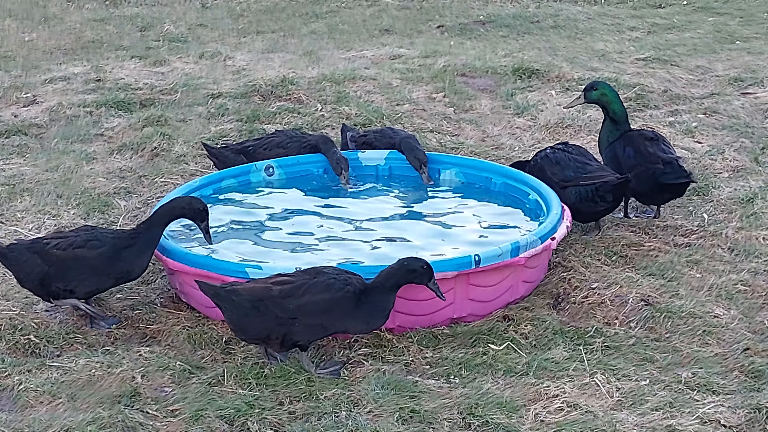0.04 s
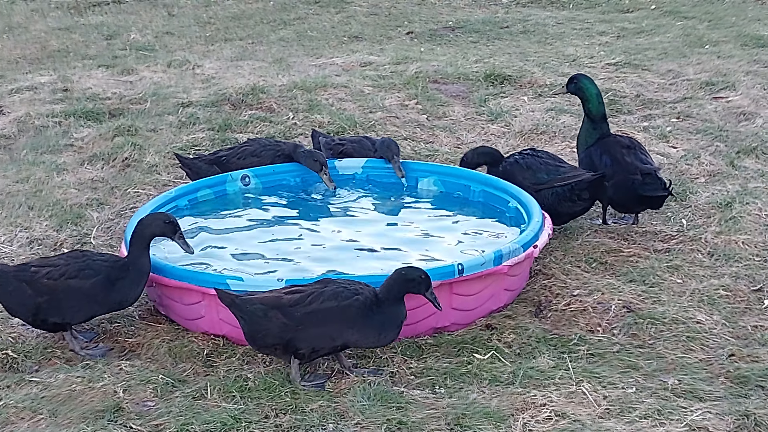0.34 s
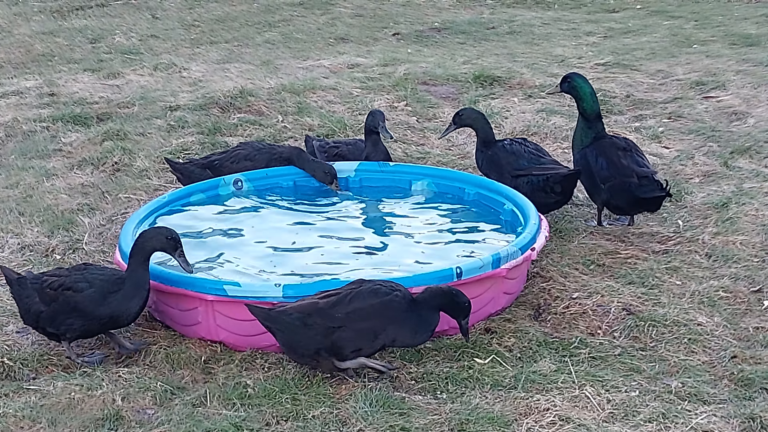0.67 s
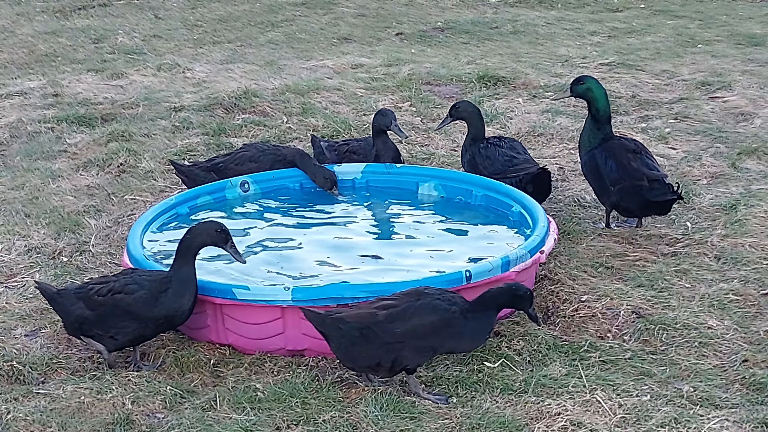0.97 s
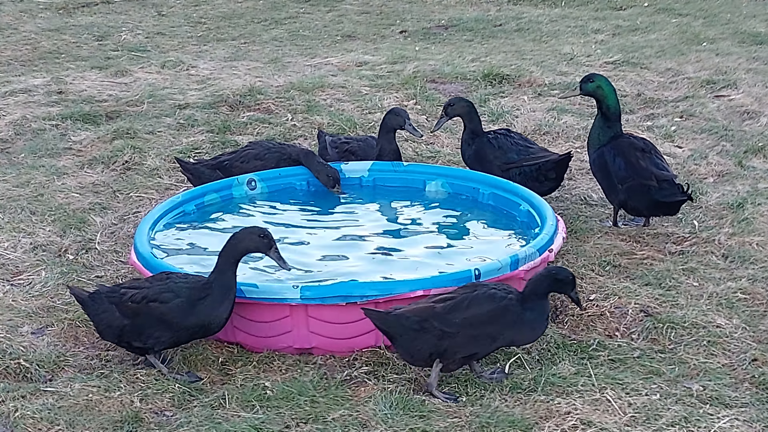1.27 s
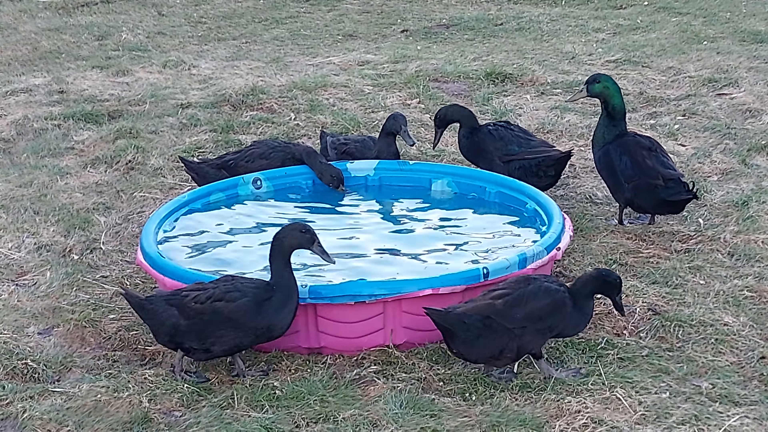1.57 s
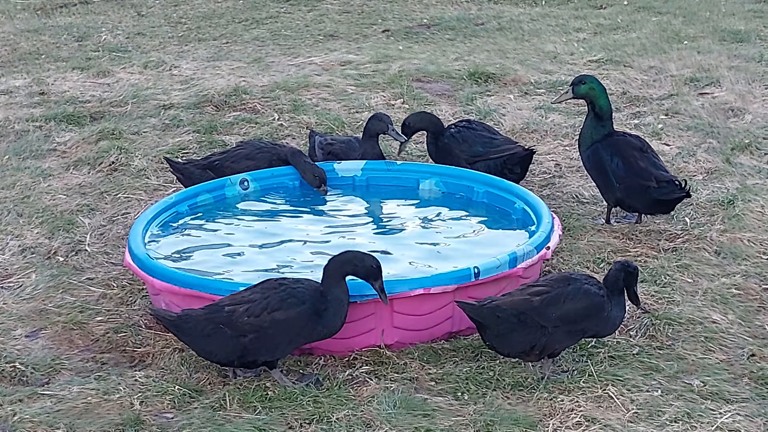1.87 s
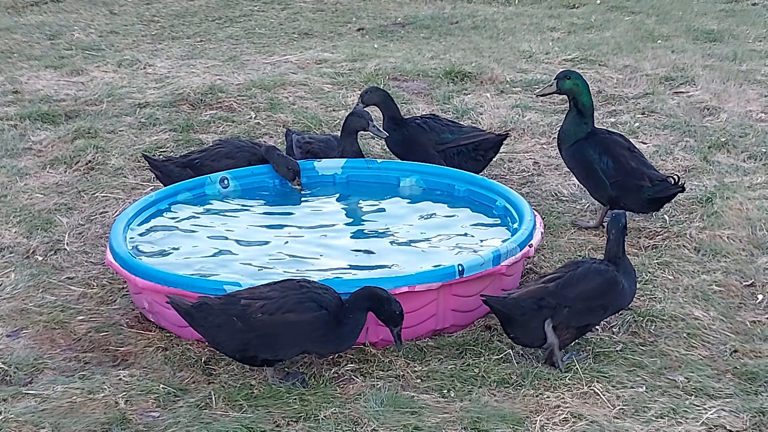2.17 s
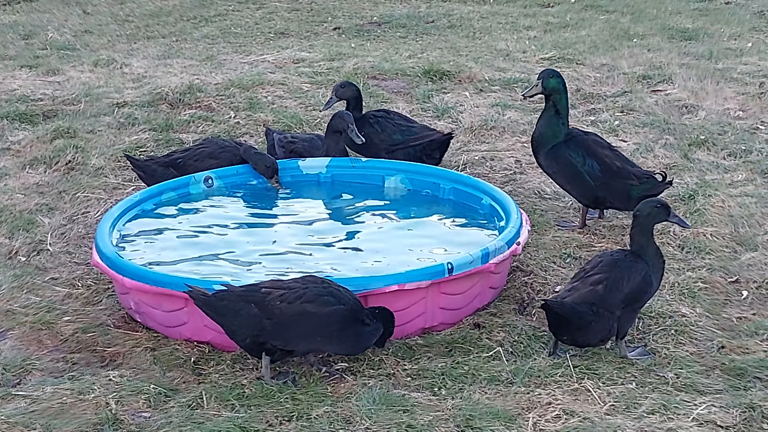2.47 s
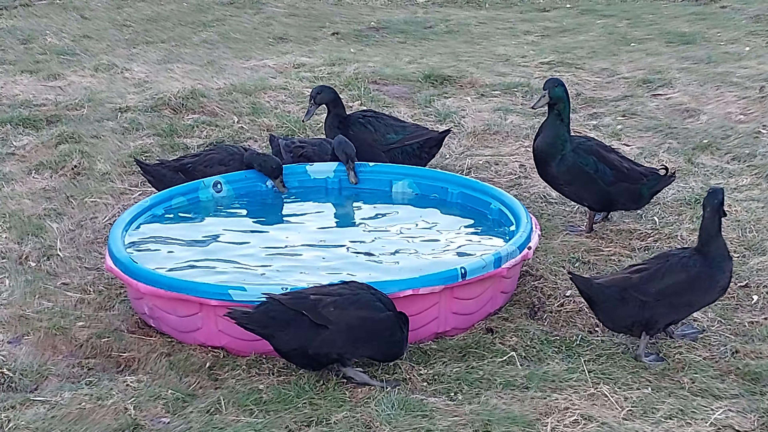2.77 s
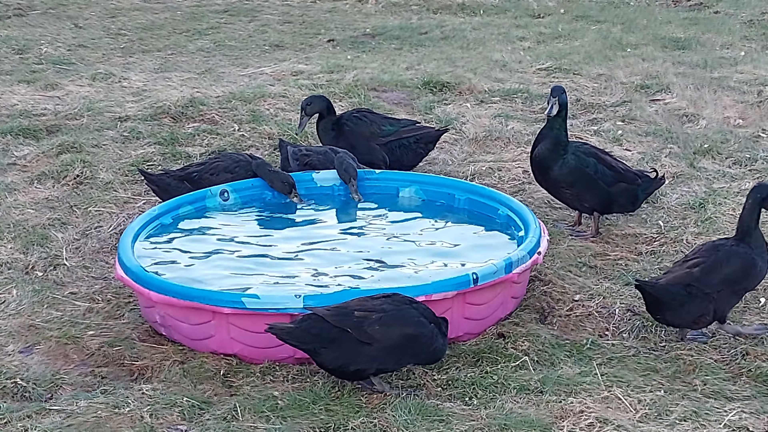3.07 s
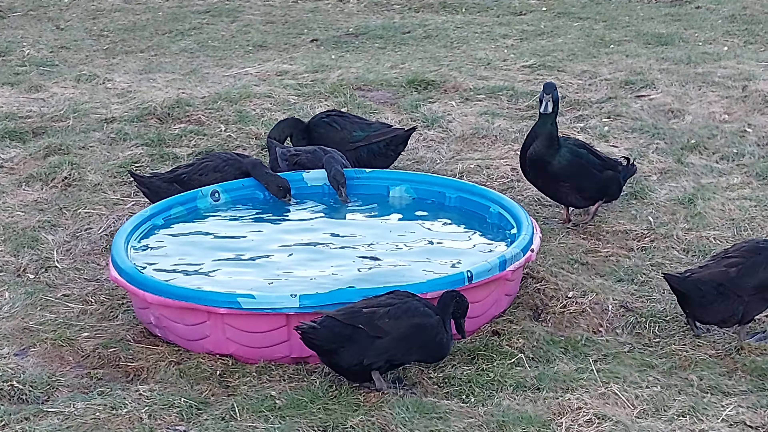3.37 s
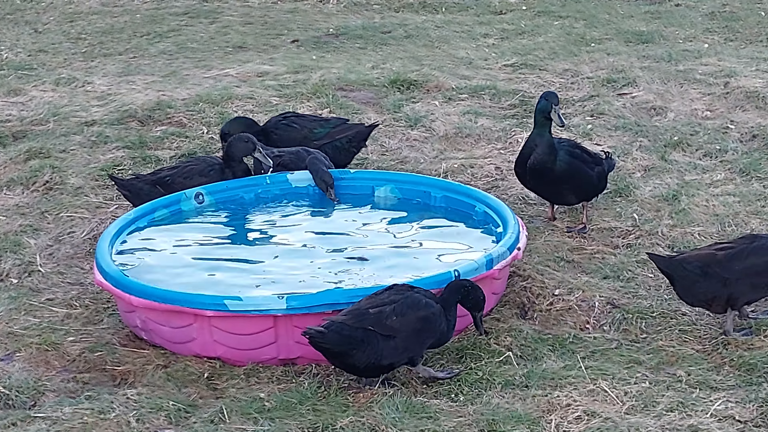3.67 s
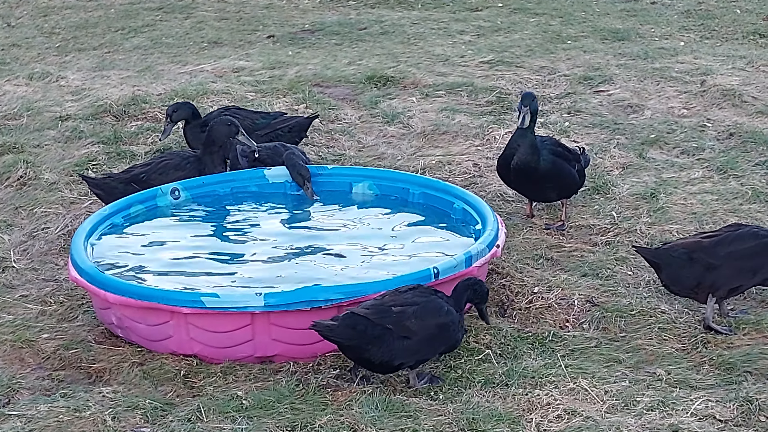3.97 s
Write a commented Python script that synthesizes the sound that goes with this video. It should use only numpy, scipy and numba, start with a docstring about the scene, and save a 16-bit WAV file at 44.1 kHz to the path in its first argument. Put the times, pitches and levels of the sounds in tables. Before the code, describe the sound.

Soft, short duck quacks and raspy calls mix with wet bill clicking outdoors, while far engines and a road hum quietly.

```python
"""A grassy yard with a plastic wading pool, ducks feeding a few metres from the microphone.
Their bills click, smack and dabble in wet grass and mud. Hens give low quacks, membrane pulses ringing
throat and chest; drakes give short hoarse rasps, slower breathy pulses in a long windpipe.
Far off, a small bird chirps twice and engines hum and drone under the tyre wash of a road."""
import sys
import numpy as np
from scipy import signal
from scipy.fft import rfft, irfft
from scipy.io import wavfile
from scipy.ndimage import uniform_filter1d
from numba import njit

SR = 44100
rng = np.random.default_rng(int(sys.argv[2]) if len(sys.argv) > 2 else 0)


def unload_audio(sound):
    """Save the sound as a 16-bit wav file, at the path given as the first command line argument."""
    columns = np.transpose(np.atleast_2d(sound))
    # keep every value between -1 and 1, then stretch to whole-number steps
    steps = np.round(np.clip(columns, -1, 1) * 32767)
    wavfile.write(sys.argv[1], SR, steps.astype(np.int16))


N = 319725
TIME = np.arange(N) / SR
TOP_HZ = 15900  # upper edge of the recorder's band


def amp(db):
    """Decibels to gain."""
    return 10 ** (np.asarray(db) / 20)


def unit(x):
    """Scale to rms 1."""
    return x / np.sqrt(np.mean(x ** 2) + 1e-20)


def curves(table):
    """The columns after a table's time column, one value a sample."""
    times, *columns = np.transpose(table)
    return [np.interp(TIME, times, column) for column in columns]


def swells(table, rest_db):
    """Bell-shaped swells over a steady level, as a gain."""
    power = sum(amp(db) ** 2 * np.exp(-((TIME - s) / half_s) ** 2) for s, half_s, db in table)
    return np.sqrt(amp(rest_db) ** 2 + power)


def wander(rate_hz):
    """Smooth random drift with a spread near 1."""
    hold = int(SR / rate_hz)
    steps = np.repeat(rng.standard_normal(N // hold + 1), hold)
    return 1.3 * uniform_filter1d(uniform_filter1d(steps, hold), hold)[:N]


@njit
def state_variable_filter(x, hz, width):
    """Band-pass with a moving centre, gain 1 there."""
    y, band_state, low_state = np.empty(len(x)), 0., 0.
    for i in range(len(x)):
        gain, damping = np.tan(np.pi * hz[i] / SR), width / hz[i]
        band = (band_state + gain * (x[i] - low_state)) / (1 + gain * (gain + damping))
        band_state = 2 * band - band_state
        low_state += 2 * gain * band
        y[i] = damping * band
    return y


def bandpass(x, hz, width):
    """One band, steady or moving."""
    return state_variable_filter(x, np.minimum(hz, TOP_HZ) * np.ones(len(x)), float(width))


def resonate(x, hz, width):
    """A steep-sided resonance: two wider bands in series."""
    return bandpass(bandpass(x, hz, 1.31 * width), hz, 2 * width)


def resonances(x, table, scale=1):
    """A table's resonances side by side, their frequencies times scale."""
    return sum(amp(db) * resonate(x, hz * scale, width) for hz, width, db in table)


def pan(db):
    """Left and right gains, the left louder by db."""
    return amp(np.array([[db], [-db]]) / 2)


def add(out, s, x, pan_db=0):
    """Mix a short sound in at s seconds."""
    start = max(int(s * SR), 0)
    out[:, start:start + len(x)] += pan(pan_db) * x[:N - start]


def wash(spectrum, likeness, lag_ms=0):
    """Coloured stereo noise; likeness is the power share common to both sides, late on the right."""
    freqs = np.maximum(np.arange(N // 2 + 1) * SR / N, 1)
    hz, db = np.transpose(spectrum)
    colour = amp(np.interp(np.log(freqs), np.log(hz), db, left=-90, right=-90))
    common, left, right = rfft(rng.standard_normal((3, N)))
    shared = np.array([common, common * np.exp(-2j * np.pi * freqs * lag_ms / 1000)])
    sides = np.sqrt(likeness) * shared + np.sqrt(1 - likeness) * np.array([left, right])
    return unit(irfft(colour * sides, N))


# Still air around the microphone. Each row: frequency in Hz, relative density in dB.
AIR_SPECTRUM = [(1650, -35), (2800, -8), (3260, -11), (3860, -5.5), (5280, -5), (5890, -4.5), (6670, 4),
                (7600, -2.5), (12400, -9), (14200, -9), (16000, -10)]


def still_air():
    """A faint, wide, high hiss."""
    return amp(-79.5) * wash(AIR_SPECTRUM, likeness=0.013)


# Tyres on the distant road, roar and hiss. Each row: frequency in Hz, relative density in dB.
ROAR_SPECTRUM = [(200, -22), (400, -12.5), (600, -1.5), (900, 6), (1200, -2), (1600, -13), (2400, -57)]
HISS_SPECTRUM = [(900, 2), (1600, -1.5), (1900, -4), (2350, -9), (2700, -16.5), (3500, -27), (5000, -54)]


def vehicle(passing, exhaust_spectrum, tyre_likeness, lag_ms):
    """Exhaust and tyres waver in moving air and fall off either side of the nearest point."""
    nearest_s, half_power_s, rumble_db, roar_db, hiss_db = passing
    layers = [(rumble_db, wash(exhaust_spectrum, .93, lag_ms)),
              (roar_db, wash(ROAR_SPECTRUM, tyre_likeness, lag_ms)),
              (hiss_db, wash(HISS_SPECTRUM, tyre_likeness, lag_ms))]
    wavering = sum(noise * amp(db + 1.5 * wander(16)) for db, noise in layers)
    relative_distance = np.hypot(1, (TIME - nearest_s) / half_power_s)
    return wavering / relative_distance


# Exhausts far ahead of the microphone and off left. Each row: frequency in Hz, relative density in dB.
EXHAUST_AHEAD = [(20, -37), (40, -17), (55, -1.5), (80, 3), (125, -1.5), (170, -5), (240, -2.5), (300, -13),
                 (420, -19), (700, -20.5)]
EXHAUST_LEFT = [(20, -24), (40, -12.5), (55, -3.5), (90, 3), (130, -0.5), (180, -1.5), (240, -8),
                (300, -18), (420, -34.5), (700, -64)]
# Vehicles passing there. Each row: nearest moment in seconds, seconds from then until 3 dB down,
# then exhaust rumble, tyre roar and tyre hiss in dB.
TRAFFIC_AHEAD = [(.55, 0.65, -52, -55.5, -69.5), (1.7, 0.11, -55, -56.5, -100),
                 (2.85, 0.22, -52, -58.5, -69.5)]
TRAFFIC_LEFT = [(4.9, 0.75, -49, -56.5, -65), (6.0, 0.28, -55.5, -58, -65.5)]


def road():
    """Vehicles pass ahead, then on the left, over steady traffic farther off."""
    far_roar = amp(-63) * wash(ROAR_SPECTRUM, likeness=0.062)
    far_hiss = amp(-74.5) * wash(HISS_SPECTRUM, likeness=0.049)
    ahead = sum(vehicle(row, EXHAUST_AHEAD, tyre_likeness=0.18, lag_ms=0.051) for row in TRAFFIC_AHEAD)
    left = sum(vehicle(row, EXHAUST_LEFT, tyre_likeness=0.84, lag_ms=0.5) for row in TRAFFIC_LEFT)
    return far_roar + far_hiss + ahead + left


def far_tone(hz, db, waver, flutter_db, harmonics_db=(0,)):
    """A wavering tone whose harmonics fade in and out with the air."""
    phase = 2 * np.pi * np.cumsum(hz * (1 + waver * wander(14))) / SR
    return np.sqrt(2) * sum(amp(db + harmonic_db + flutter_db * wander(11)) * np.sin(k * phase)
                            for k, harmonic_db in enumerate(harmonics_db, 1))


# An engine idling far from the yard. Each row: time in seconds, firing rate in Hz, level in dB.
IDLE_CURVE = [(0, 65.9, -54.5), (1.4, 63.93, -53), (4.8, 62.6, -52), (6.3, 61.03, -51), (6.7, 60.3, -63),
              (7.25, 62.3, -54)]


def idling_engine():
    """A low hum of the firing rate and two overtones, sagging and dipping near the end."""
    return far_tone(*curves(IDLE_CURVE), waver=0.02536, flutter_db=2.0, harmonics_db=[-1, -16.5, -17])


# A distant vehicle's engine. Each row: time in seconds, firing rate in Hz.
DRONE_PITCH = [(0, 223), (.3, 213), (.6, 196), (1.3, 194), (2.5, 213.5), (4.2, 215)]
# Its swells at the microphone. Each row: middle and half length in seconds, level in dB.
DRONE_SWELLS = [(.28, 0.17, -55), (1.88, 0.18, -56.5), (2.78, 0.16, -48.5), (3.2, 0.097, -52),
                (4.15, 0.15, -57.5)]


def droning_engine():
    """A drone at the firing rate that comes through in swells."""
    drone = far_tone(*curves(DRONE_PITCH), db=0, waver=0.0052, flutter_db=2.5)
    return swells(DRONE_SWELLS, rest_db=-70) * drone


def whine():
    """A thin, far whine that never stops."""
    return far_tone(hz=2280, db=-87.5, waver=0.008, flutter_db=1.5)


# The flock rummaging in the grass, a few metres off.
# Each row: middle and half length in seconds, relative level in dB.
RUMMAGING = [(.2, .15, -80), (.65, .18, -79), (2.8, .27, -78.5), (3.3, .12, -78), (4.37, .2, -80),
             (5.25, 0.13, -85.5), (5.88, .1, -79), (6.13, .1, -82.5), (6.6, .06, -86)]
RUMMAGING_REST_DB = -87.5


def dabbling(cracks_per_s=2000, nibbles_per_s=45, spread_db=2.2):
    """Wet blades of grass snap in countless tiny cracks, mostly on the right, among softer nibbles."""
    rates = np.array([[cracks_per_s], [cracks_per_s], [nibbles_per_s]])
    hits = rng.random((3, N)) < rates / SR
    sizes = amp(spread_db * np.minimum(rng.exponential(size=(3, N)), 4))
    left, right, bites = hits * sizes * rng.choice([-1, 1], (3, N))
    cracks = [bandpass(bandpass(side, 11300, 4900), 14200, 8800) for side in (left, right)]
    crackle = amp(-4.0) * pan(-17) * unit(np.array(cracks))
    bursts = uniform_filter1d(bites, size=130) * rng.standard_normal(N)
    nibbles = amp(-7.5) * unit(resonate(bursts, 6300, 3000))
    return swells(RUMMAGING, RUMMAGING_REST_DB) * (crackle + nibbles)


def smack(hz, width, rise_per_s=22, muffle_hz=3230):
    """A wet film bursts in a parting bill: a rising cavity resonance, muffled by water; peak 1."""
    t = TIME[:SR // 40]
    burst = rng.standard_normal(len(t)) * (1 - np.exp(-t / 0.0012)) * np.exp(-t / 0.0017)
    cavity = resonate(burst, hz * (1 + rise_per_s * (t - .003)), width)
    muffled = signal.sosfilt(signal.butter(4, muffle_hz, fs=SR, output="sos"), cavity)
    return muffled / np.abs(muffled).max()


# Bouts in the wet mud by the pool. Each row: middle and half length in seconds, level in dB.
MUD_BOUTS = [(.06, .06, -84.5), (.28, 0.045, -70), (.72, 0.068, -80), (2.86, 0.15, -73), (4.3, .09, -76),
             (6.15, 0.032, -75)]


def squelching(splashes_per_s=60, splash_hz=2310, spread_oct=0.2):
    """Tiny splashes at chance moments, each with its own size and pitch."""
    out, count = np.zeros((2, N)), int(splashes_per_s * N / SR)
    for s, size, octaves in rng.uniform([0, -1, -spread_oct], [TIME[-1], 1, spread_oct], (count, 3)):
        add(out, s, amp(3.4 * size) * smack(splash_hz * 2 ** octaves, width=770))
    return swells(MUD_BOUTS, rest_db=-93) * unit(out)


# Wet bills, a few metres straight ahead.
# Each row: start in seconds, peak in dB, cavity resonance and its width in Hz.
WET_SMACKS = [(0.022, -51, 2460, 330), (.103, -55.5, 2080, 1080), (.28, -58, 2300, 1400),
              (.305, -59, 2500, 900), (.699, -46.5, 1820, 340), (.737, -52, 2380, 380),
              (1.0964, -56, 1830, 350), (1.254, -53.5, 1880, 326), (2.336, -45, 1410, 322),
              (2.857, -56, 2400, 600), (2.889, -43, 2170, 600), (2.9783, -48.5, 1520, 715),
              (3.281, -51.5, 2420, 600), (4.288, -49, 2000, 600), (4.343, -51.5, 1950, 597),
              (6.066, -55, 2100, 600)]


def bill_smacks():
    """Single smacks of wet bills parting."""
    out = np.zeros((2, N))
    for s, db, hz, width in WET_SMACKS:
        add(out, s, amp(db) * smack(hz, width))
    return out


def faint_clicks(count, db=-71.5, spread_db=0.5, hz=8600, spread_oct=0.36):
    """Chance rows like those of LOUD_CLICKS, likelier while the ducks rummage."""
    effort = np.cumsum(swells(RUMMAGING, RUMMAGING_REST_DB))
    times = np.interp(rng.random(count), effort / effort[-1], TIME)
    return [(s, db + spread_db * size, hz * 2 ** (spread_oct * pitch))
            for s, (size, pitch) in zip(times, rng.standard_normal((count, 2)))]


# Bills snapping a few metres off, the duller ones ahead, the brighter right of the microphone.
# Each row: start in seconds, peak in dB, ring in Hz.
LOUD_CLICKS = [(0.0623, -61, 7890), (0.114, -62, 12300), (0.1628, -47, 7560), (0.2074, -56, 11600),
               (0.237, -42.5, 7000), (.257, -54, 5000), (.281, -55.5, 5600), (0.4596, -61, 4600),
               (.625, -57.5, 12300), (.6694, -62, 7300), (0.7002, -57, 6750), (0.7377, -58, 6690),
               (1.0121, -60, 13370), (1.185, -59, 5200), (1.9938, -62, 6500), (2.265, -55.5, 5070),
               (2.3376, -55.5, 5470), (2.36, -63, 5870), (2.585, -60, 8050), (2.6125, -60, 13700),
               (2.7227, -60, 13200), (2.9482, -61, 11800), (2.971, -50, 10100), (2.982, -45, 6030),
               (3.035, -53, 6200), (3.2186, -64, 4880), (3.281, -53, 5100), (3.292, -51, 7000),
               (3.307, -46, 7340), (3.645, -53.5, 4870), (3.662, -58, 5340), (3.7973, -61, 6630),
               (4.1016, -60.5, 6310), (4.2847, -52, 7000), (4.6019, -62, 11400), (5.9189, -58, 13500),
               (6.0691, -68, 7410), (6.137, -61, 7140), (6.294, -50.5, 7540), (6.6143, -63, 11000)]


def bill_clicks(ahead_hz=5060, pan_db_per_oct=-6, crack_s=0.00079):
    """Hard bills snap shut with a short crack, brighter the harder they close."""
    out, t = np.zeros((2, N)), TIME[:SR // 20]
    decay = np.exp(-t / crack_s)
    for s, db, hz in LOUD_CLICKS + faint_clicks(count=22):
        crack = rng.standard_normal(len(t)) * (1 - decay) ** 2 * decay
        brightness = amp(0.69 * (db + 38.5))
        click = resonate(crack, hz, 0.29 * hz) + brightness * resonate(crack, 13500, 6000)
        add(out, s, amp(db) * click / np.abs(click).max(), pan_db_per_oct * np.log2(hz / ahead_hz))
    return out


# A small bird, far off. Each row: start and length in seconds, level in dB, top pitch in Hz.
BIRD_NOTES = [(0.513, 0.07, -80.5, 3740), (6.089, 0.091, -86, 3780)]


def bird(rise=0.053, drop=0.2):
    """Thin wavering notes that rise a little and drop away at the end."""
    out = np.zeros((2, N))
    for s, length, db, hz in BIRD_NOTES:
        progress = np.linspace(0, 1, int(length * SR))
        arch = np.sin(np.pi * progress)
        pitch = hz * (1 + rise * (arch - 1) - drop * progress ** 8 + 0.021 * wander(300)[:len(arch)])
        add(out, s, amp(db) * unit(np.sin(2 * np.pi * np.cumsum(pitch) / SR) * arch))
    return out


def syrinx(length, first_hz, last_hz, breath, puff_s, jitter=.06, scatter_db=1.8):
    """Membrane slaps, each trailing a puff of air; also gives the call's progress from 0 to 1."""
    n = int((length + .02) * SR)
    slaps, s = np.zeros(n), .001
    for delay, size in rng.standard_normal((32, 2)):
        if s < length:
            slaps[int(s * SR)] = amp(scatter_db * size)
            rate_hz = first_hz + (last_hz - first_hz) * (s / length) ** 3
            s += np.exp(jitter * delay) / rate_hz
    puff_envelope = signal.lfilter([1], [1, -np.exp(-1 / (puff_s * SR))], slaps)
    puffs = puff_envelope * rng.standard_normal(SR)[:n]
    return unit(slaps) + breath * unit(puffs), np.minimum(TIME[:n] / length, 1)


# Resonances all hens share: throat, chest, nasal ring and the thin edge of an open bill.
# Each row: frequency and width in Hz, relative level in dB.
HEN_THROAT = [(562, 294, 1.5), (875, 285, 5.5), (1106, 214, 0), (2070, 1240, -11)]
HEN_CHEST = [(184, 91, 6.3), (308, 39, 6)]
HEN_NASAL = [(3060, 350, -1), (6900, 560, -15)]
HEN_BILL = [(3720, 460, -12), (4530, 240, -2.5), (5000, 320, -4), (6640, 450, -11)]
# Hens a few metres ahead of the microphone. Each row: start and length in seconds, level in dB,
# first and last pulse rate in Hz, throat and chest tuning as a ratio, the bird's own resonance in Hz,
# its gain in dB, chest gain in dB, bill opening as a cut-off in Hz, nasal gain in dB.
HEN_QUACKS = [(0.811, 0.058, -48.5, 173.1, 109.4, 1.05, 1046, 5, -4, 1370, -28),
              (2.721, 0.039, -51.5, 119.8, 111, 1.33, 1090, -10, 0, 1340, -31),
              (2.91, 0.022, -50, 124.8, 111, 1.38, 1200, 13, 0, 1800, -18),
              (3.004, 0.051, -50, 124.9, 131, 1.03, 1200, 9, 0, 1500, -38),
              (3.064, 0.066, -45, 160.1, 100, 1.014, 995, 0, -0.5, 2600, -41),
              (3.3453, 0.061, -43.5, 180, 115.5, 1.08, 1280, 7, 1, 3030, -19),
              (5.774, 0.044, -53, 157.3, 125.3, 0.94, 717, 14.5, -1.5, 1220, -40),
              (7.081, 0.067, -47.5, 153.3, 62.8, 0.89, 590, 11, 2, 1500, -9.5),
              (7.206, 0.047, -70.5, 131.3, 101, 0.8, 1020, 6, -12, 1280, -39)]


def hens(throat_fall=0.2, throat_arch=0.047):
    """Pulses, mostly slowing, ring the chest and a sinking throat; a half-shut bill dulls the voice."""
    out = np.zeros((2, N))
    for quack in HEN_QUACKS:
        s, length, db, first_hz, last_hz, scale, own_hz, own_db, chest_db, open_hz, nasal_db = quack
        pulses, progress = syrinx(length, first_hz, last_hz, breath=0.22, puff_s=0.0015)
        effort = np.sin(np.pi * progress)
        pulses *= 0.45 + 0.61 * progress + effort
        bend = scale * (1 + throat_fall * (.5 - progress) + throat_arch * (effort - 2 / np.pi))
        throat = resonances(pulses, HEN_THROAT, bend)
        chest = amp(chest_db) * resonances(pulses, HEN_CHEST, scale)
        own_ring = amp(own_db) * resonate(pulses * effort, own_hz, 76)
        voice = signal.sosfilt(signal.butter(3, open_hz, fs=SR, output="sos"), throat + chest + own_ring)
        nasal = amp(nasal_db) * resonances(pulses * effort, HEN_NASAL)
        edge = amp(-24.0 + 8.5 * np.log2(open_hz / 2000)) * resonances(pulses, HEN_BILL)
        add(out, s, amp(db) * unit(voice + nasal + edge))
    return out


# Resonances of a drake's windpipe and of the hiss in his bill.
# Each row: frequency and width in Hz, relative level in dB.
DRAKE_WINDPIPE = [(1250, 82, 8.5), (1563, 93, 6.5), (1956, 80, 2), (2424, 79, 0), (2820, 74, -13)]
DRAKE_BILL = [(4450, 260, -9), (4960, 730, 6.5), (5860, 500, -9)]
# Drakes a few metres off, a little left of the microphone. Each row: start and length in seconds,
# level in dB, mouth resonance shut and open in Hz, windpipe tuning as a ratio, neck gain in dB,
# hiss against the voice in dB.
DRAKE_RASPS = [(1.6, 0.044, -65.5, 1200, 1750, .97, 7, -35),
               (1.871, 0.065, -57, 1300, 2180, 1.0, 12.5, -37),
               (2.184, 0.073, -54, 1250, 2110, 0.98, 11.5, -35),
               (2.475, 0.07, -55, 1240, 2300, 1.0, 2, -23), (2.749, 0.07, -51.5, 1600, 2400, 1, 3.5, -19.5),
               (3.046, 0.07, -55.5, 1300, 2260, .96, 9, -17), (3.31, 0.079, -50, 1450, 2510, 1, 4, -17.5),
               (3.686, 0.07, -56, 1330, 2090, .995, -4, -23),
               (3.912, 0.0923, -54.5, 1230, 2440, 1.002, 5.5, -22.5),
               (4.751, .08, -59.5, 1300, 1540, 1.0, -6, -40),
               (5.019, 0.081, -56.5, 1220, 2310, 1.04, 10, -23.5),
               (5.54, 0.0675, -54, 1350, 1980, 1.05, -9, -31.5)]


def drakes(mouth_width_hz=375, pipe_arch=0.04):
    """Slow breathy pulses ring a long windpipe; the bill opens and shuts, sweeping its resonances."""
    out = np.zeros((2, N))
    lowest_hz, lowest_width, _ = DRAKE_WINDPIPE[0]
    for s, length, db, shut_hz, open_hz, scale, neck_db, hiss_db in DRAKE_RASPS:
        pulses, progress = syrinx(length, first_hz=86, last_hz=81.46, breath=.6, puff_s=.004)
        opening = np.sin(np.pi * progress ** 1.18)
        pulses *= opening ** .9
        mouth = resonate(pulses, shut_hz + (open_hz - shut_hz) * opening, mouth_width_hz)
        bend = scale * (1 + pipe_arch * (opening - np.pi / 4))
        pipe = resonances(mouth, DRAKE_WINDPIPE, bend)
        # early in the call the lowest resonance also sounds through the neck
        neck = amp(neck_db) * (1 - progress) ** 2 * resonate(pulses, lowest_hz * bend, lowest_width)
        # the open bill leaks hiss, most at each pulse
        pulse_envelope = np.abs(signal.hilbert(mouth)) / mouth.std()
        leak = rng.standard_normal(len(pulses)) * opening * (pulse_envelope + 1.6)
        hiss = amp(hiss_db) * unit(resonances(leak, DRAKE_BILL))
        add(out, s, amp(db) * (unit(pipe + neck) + hiss), pan_db=2.5)
    return out


# A second distant vehicle, coming forward after four seconds.
# Each row: time in seconds, firing rate in Hz, level in dB.
SPEEDING_CURVE = [(4.1, 124.5, -59.5), (4.9, 140.8, -52), (5.25, 140, -49.5), (5.9, 137.4, -53.5),
                  (6.6, 136.7, -59.5), (7, 139.5, -54)]


def speeding_engine():
    """A quiet drone at the firing rate that grows as the vehicle speeds up, then holds its pitch."""
    return far_tone(*curves(SPEEDING_CURVE), waver=0.013, flutter_db=0.5)


def yard(x, wet_db, t60_s):
    """Ground, pool wall and fences scatter a short, different echo to each side."""
    t = TIME[:SR // 3]
    tail = rng.standard_normal((2, len(t))) * amp(-60 * t / t60_s) * (t > .002)
    tail /= np.sqrt(np.sum(tail ** 2, axis=1, keepdims=True))
    return x + amp(wet_db) * signal.fftconvolve(x, tail, axes=1)[:, :N]


def scene():
    """The flock near the microphone, with a bird, engines, road and still air behind it."""
    calls = yard(hens() + drakes(), wet_db=-4.0, t60_s=0.15)
    feeding = yard(bill_clicks() + bill_smacks() + squelching(), wet_db=-2.5, t60_s=0.15)
    far_bird = yard(bird(), wet_db=5.0, t60_s=0.25)
    engines = idling_engine() + droning_engine() + speeding_engine()
    return calls + feeding + far_bird + engines + whine() + still_air() + dabbling() + road()


def record(dry):
    """The recorder cuts the treble steeply above TOP_HZ."""
    return signal.sosfilt(signal.ellip(10, .2, 70, TOP_HZ, fs=SR, output="sos"), dry)


dry = scene()
out = record(dry)
unload_audio(out)
```